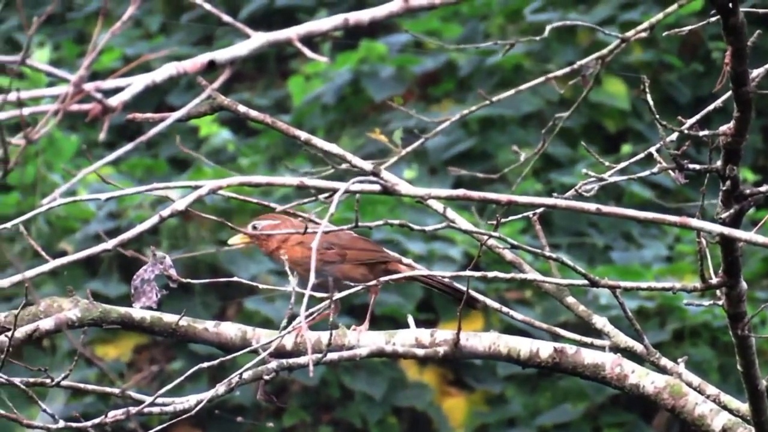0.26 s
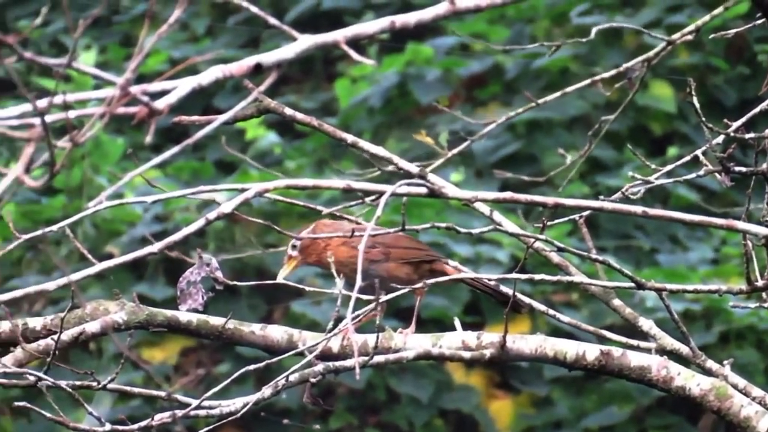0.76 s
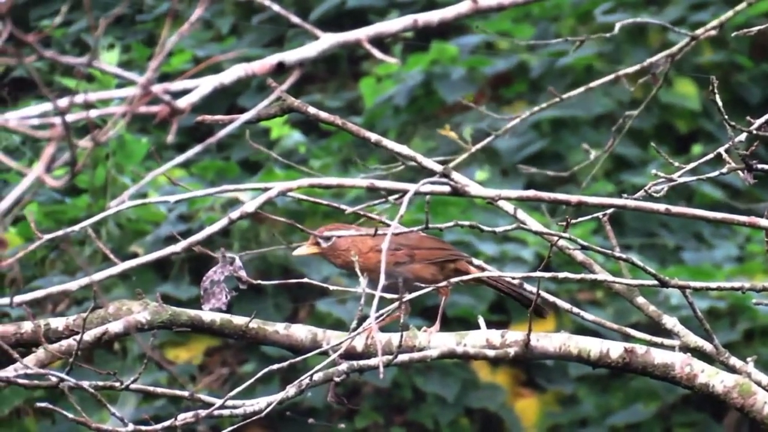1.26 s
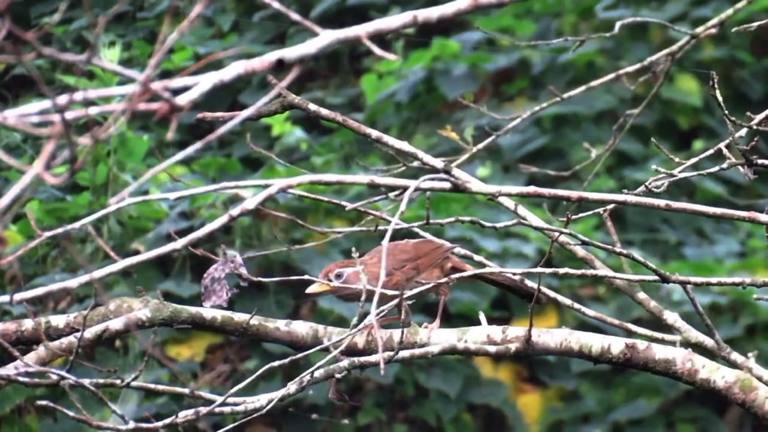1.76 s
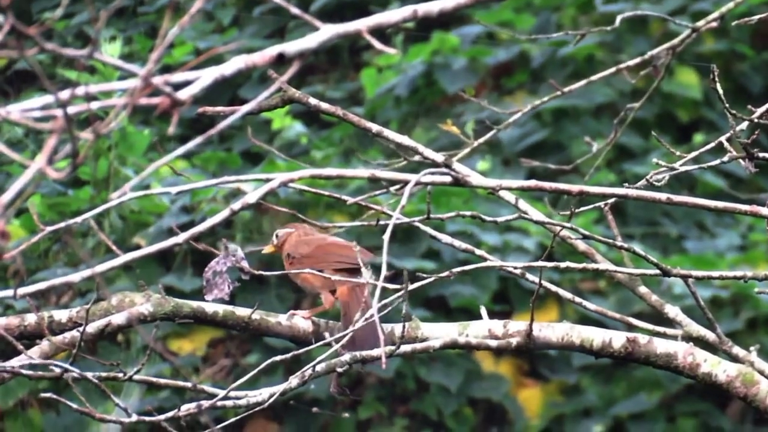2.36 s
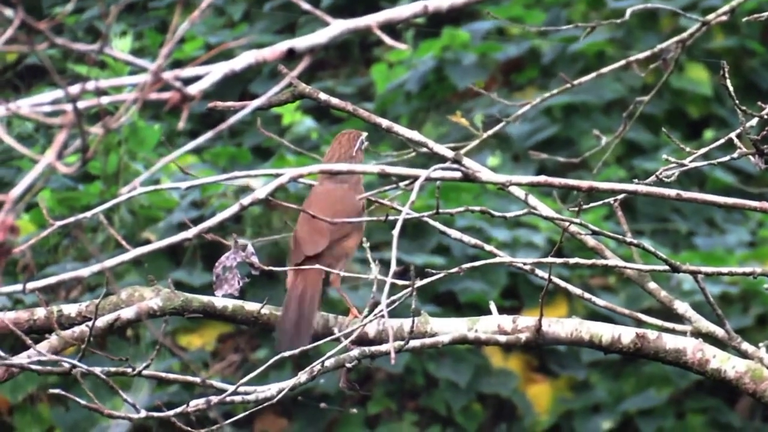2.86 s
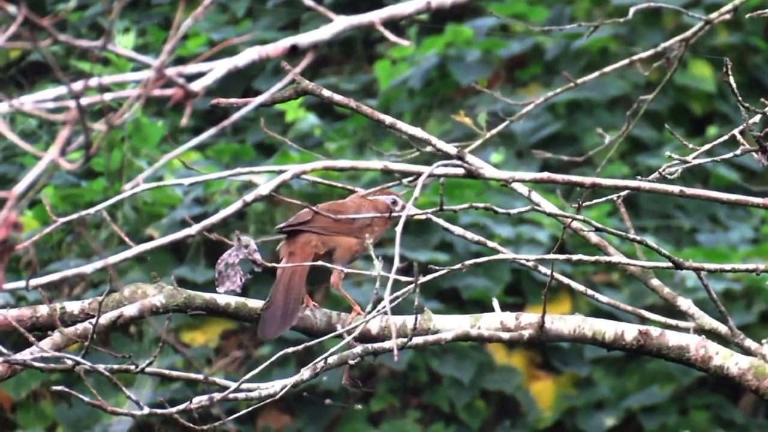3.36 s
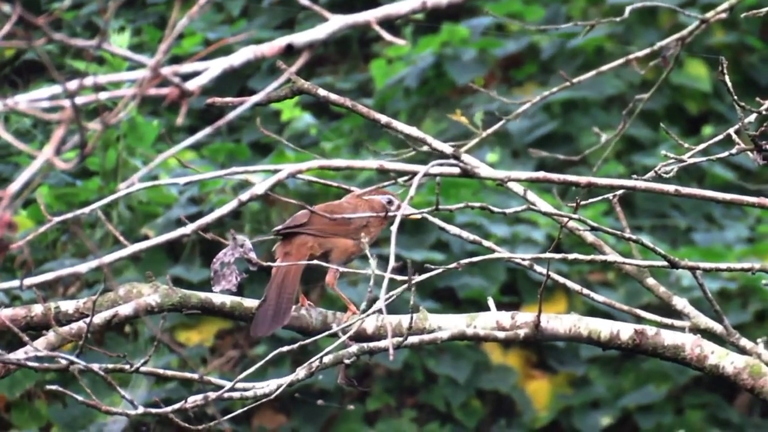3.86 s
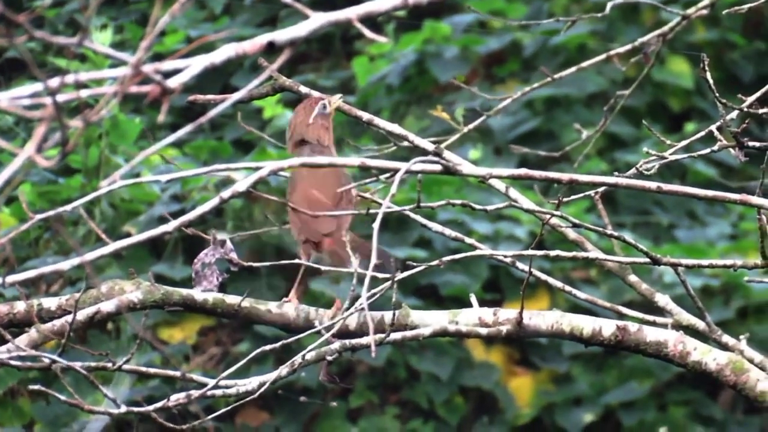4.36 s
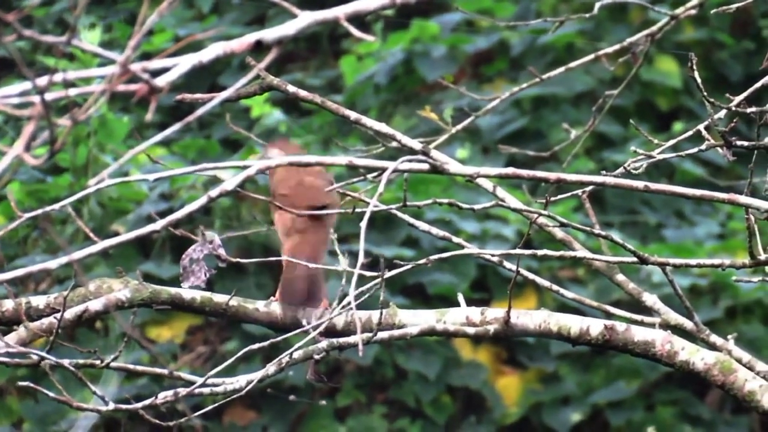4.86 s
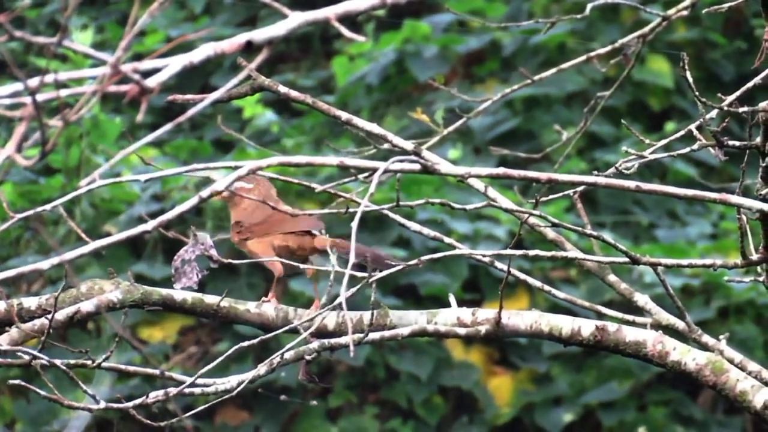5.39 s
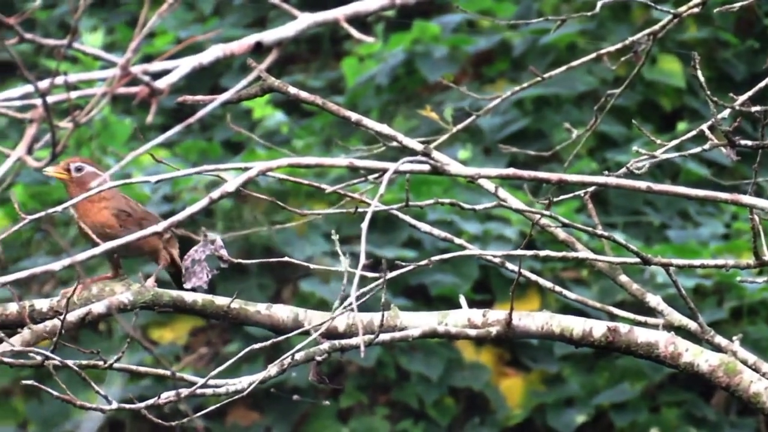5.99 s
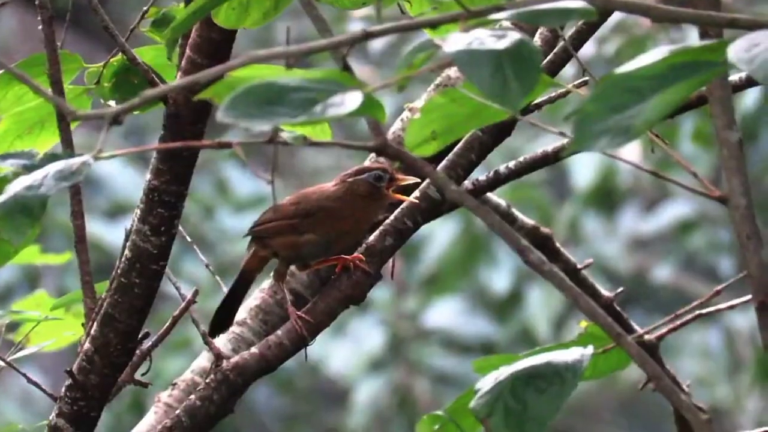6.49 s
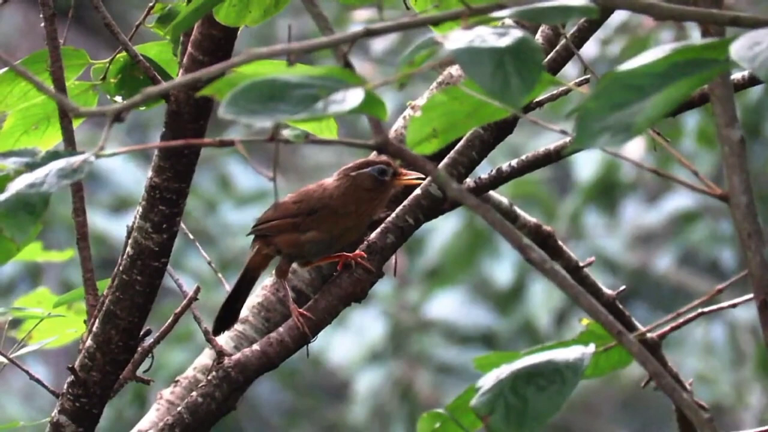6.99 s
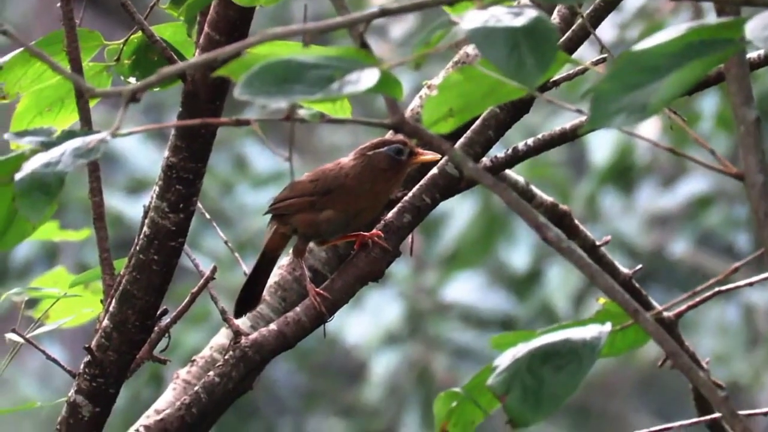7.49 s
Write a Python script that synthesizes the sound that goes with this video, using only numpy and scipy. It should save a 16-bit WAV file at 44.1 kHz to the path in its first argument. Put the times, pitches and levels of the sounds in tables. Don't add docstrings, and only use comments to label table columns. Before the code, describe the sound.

A brown thrush opens with a fast loud warble, then gives three more short rising bursts and one low rough buzz, seconds apart. Rivals whistle faintly, blurred by the wood. Crickets scrape double chirps over a steady high insect chorus and sizzling cicadas. Near the end the place shifts abruptly: clean gliding whistles, a dove cooing and a cricket ticking evenly. The tripod-mounted microphone picks up dull low thumps.

```python
import sys
import numpy as np
from scipy import signal
from scipy.fft import rfft, irfft, next_fast_len
from scipy.io import wavfile
from scipy.ndimage import uniform_filter1d, map_coordinates

SR = 44100
rng = np.random.default_rng(int(sys.argv[2]) if len(sys.argv) > 2 else 0)


def wrap_up_sound(samples):
    columns = np.atleast_2d(samples).T
    tamed = np.clip(columns, -1, 1)
    steps = np.round(tamed * 32767).astype(np.int16)
    wavfile.write(sys.argv[1], SR, steps)


def gain_from_db(level_db):
    decades = np.asarray(level_db, float) / 20
    return 10 ** decades


N = 341334
CUT_S = 6.412

# (crest time [s], crest [Hz], next trough [Hz], level [dB])
BURST_SWINGS = [
    [(.007, 2150, 1330, -22), (.028, 2500, 1500, -17), (.047, 2900, 1600, -14.5), (.066, 3200, 1680, -14),
     (.087, 3550, 1900, -14), (.107, 3600, 2300, -14), (.13, 3100, 2350, -15.5), (.146, 2900, 2400, -22)],
    [(3.105, 2150, 1450, -24), (3.125, 2250, 1550, -19), (3.146, 2550, 1800, -16), (3.166, 2900, 1850, -17),
     (3.189, 3850, 2200, -18.5)],
    [(4.641, 2050, 1450, -23), (4.66, 2200, 1600, -18), (4.68, 2350, 1700, -15), (4.699, 2500, 1850, -13),
     (4.72, 2650, 2050, -13), (4.739, 3700, 2200, -21)],
    [(5.738, 1900, 1450, -25), (5.759, 2200, 1600, -21), (5.78, 2850, 1600, -14),
     (5.8005, 3500, 1620, -13.5), (5.822, 3650, 1750, -14), (5.844, 3200, 1850, -14.5),
     (5.864, 2950, 2150, -16)],
]
# (breath [dB], hiss [dB], octave at the troughs [dB])
BURST_NOISE = [
    (-19, -33, -1),
    (-19, -36, -14),
    (-18, -37, -20),
    (-20, -27, -10),
]
BURST_START_HZ, BURST_LEAD_S, BURST_CLOSE_S = 1450, .009, .010
STRAIGHT_SHARE = .45
RASP, TROUGH_DB = .11, 4
BURR_HZ, BURR_DB, BURR_SWING_HZ = 320, 2.8, 40
BUZZ_S, BUZZ_LENGTH_S, BUZZ_DB, BUZZ_PULSE_HZ = 5.138, .198, -27.5, 78
BUZZ_START_HZ, BUZZ_END_HZ, BUZZ_SWING_HZ = 1430, 1290, 320
BUZZ_LEAD_S, BUZZ_LEAD_DB, BUZZ_BREATH_DB = .018, -9, -8
# (time [s], pitch [Hz], level [dB])
WHISTLE_GLIDES = [
    [(6.413, 2214, -29.5), (6.45, 2474, -30), (6.522, 2850, -27.5), (6.535, 2860, -21)],
    [(6.597, 4020, -29), (6.63, 3747, -30), (6.685, 3530, -26.5), (6.73, 3747, -24), (6.755, 3770, -19),
     (6.78, 3760, -20), (6.82, 3280, -35), (6.85, 3130, -43), (6.865, 3350, -24)],
    [(6.935, 1836, -41), (6.98, 1824, -32.5), (7.03, 1893, -27.5), (7.065, 1823, -30.5),
     (7.098, 1750, -29.5), (7.155, 2294, -28.5), (7.19, 2473, -28), (7.215, 2466, -35), (7.24, 2400, -44)],
]

# (time [s], length [s], level [dB])
RIVAL_FLICKS = [(0.69, 0.04, -50), (0.796, 0.034, -48.5), (0.89, 0.031, -47.5), (0.966, 0.069, -50),
                (1.79, 0.017, -48.5), (1.876, 0.023, -55), (1.965, 0.029, -52), (2.055, 0.036, -44.5),
                (2.12, 0.055, -49), (2.84, 0.026, -53), (2.973, 0.027, -51), (3.036, 0.04, -59),
                (3.943, 0.028, -57)]
FLICK_START_HZ, FLICK_END_HZ = 1450, 2860
# (time [s], length [s], start [Hz], end
# [Hz], level [dB])
RIVAL_SLIDES = [(0.432, 0.21, 1450, 2060, -51), (0.604, 0.041, 1950, 3200, -44.5),
                (0.983, 0.13, 1510, 1905, -52), (1.077, 0.021, 2330, 3320, -49),
                (1.118, 0.068, 2145, 2370, -47), (1.587, .034, 2100, 3050, -59),
                (1.85, 0.23, 1450, 1763, -53), (2.21, 0.089, 1546, 1750, -54),
                (2.299, 0.078, 1850, 2420, -49), (4.085, 0.091, 1940, 1960, -56),
                (3.412, 0.059, 1640, 1684, -45), (3.359, 0.067, 1420, 1440, -54),
                (6.002, 0.21, 1506, 1720, -56), (6.189, 0.049, 1880, 3250, -44),
                (7.33, 0.092, 548, 510, -57), (1.33, 0.2, 1490, 1500, -59), (2.45, .17, 1500, 1500, -59),
                (3.58, .22, 1500, 1564, -65)]
FLICK_LATE, SLIDE_LATE, HOOK_LATE = 0.91, 1.1, 14
# (time [s], length [s], level [dB], lift amid the note [Hz])
RIVAL_HELD = [
    (1.295, .25, -42.5, 40),
    (2.422, .264, -44, 170),
    (3.578, .252, -44.5, 190),
]
DROP_S, DROP_HZ, DROP_DB = .018, 2700, -4
HELD_HZ, HOOK_HZ = 1790, 2900
LIFT_S, LIFT_WIDTH_S = .112, .014

NEAR_CHIRPS = [.3576, .4723, .5841, .6983, 1.3458, 1.4541, 1.5628, 1.6756, 2.0742, 2.1839, 2.2967, 2.4114,
               2.9846, 3.0929, 3.2026, 3.3119, 3.4221, 4.2298, 4.3371, 4.4478, 4.5546, 4.6653, 4.7766,
               5.4455, 5.5503, 5.659, 5.7653, 5.878, 5.9898]
SOFT_CHIRPS = [.0697, .8071, .9093, 1.0111, 1.1144, 1.2191, 1.3244, 1.4301, 1.5344, 1.6432, 1.7494, 1.8577,
               1.9679, 2.5147, 3.3957, 3.4985, 3.6072, 3.7095, 3.8157, 3.921, 4.0268, 4.1305, 4.8903,
               5.8686, 5.9743, 6.0836, 6.1883, 6.2986, 6.4038]
# (first time [s], count [chirps])
HIDDEN_CHIRPS = [
    (2.078, 4),
    (5.553, 3),
]
NEAR_DB, NEAR_HZ, SOFT_DB, SOFT_HZ = -12.5, 5070, -20.5, 5428
TICK_FIRST_S, TICK_RATE_HZ, TICK_DB = 6.4275, 23.05, -25.5

# (centre [Hz], width [Hz], level [dB])
CHORUS_BANDS = [
    (3747, 542, -39),
    (4866, 890, -39.5),
    (6226, 750, -39),
]
PERCH_DB = (1.5, 1.5, 2.5)
# (time [s], half width [s], level over the rest [dB])
LOW_SURGES = [
    (.1, 0.06, 2),
    (1.25, 0.15, 1.5),
    (2.3, 0.22, 1.5),
    (3.4, 0.36, -3.5),
    (4.35, 0.11, -21),
]
THROB_HZ, THROB_DB, THROB_S = 4.27, 1.5, 7.0
DRIFT_DB = .8
# (centre [Hz], width [Hz], swells (time [s], half width [s], level [dB]))
LONE_SINGERS = [
    (4350, 130, [(.3, 0.38, -54), (.92, 0.21, -44), (2.0, 0.86, -49), (4.0, 0.67, -66)]),
    (3660, 83, [(.85, 0.08, -53), (1.2, 0.065, -44), (2.25, 0.033, -38), (3.38, 0.03, -37)]),
    (2920, 120, [(.4, 0.051, -45), (1.9, 0.15, -51), (2.4, 0.063, -44)]),
    (13200, 900, [(7.0, .3, -56), (7.6, .25, -56)]),
]
# (time [s], half width [s], level [dB])
CICADA_SWELLS = [(.08, 0.16, -43), (.78, 0.11, -43.5), (1.35, 0.11, -49), (2.25, 0.11, -45),
                 (2.6, 0.23, -49), (3.68, 0.15, -44.5), (4.3, 0.73, -51.5), (4.98, 0.19, -44.5),
                 (5.6, 0.49, -50), (6.3, 0.32, -45), (7.15, 0.41, -45.5)]
# (frequency [Hz], density [dB per Hz])
CICADA_COLOUR = [(8000, -8.5), (11000, -7), (13800, -5.5), (15800, -10.5)]
# (frequency [Hz], density [dB per Hz])
HIGH_INSECT_COLOUR = [(6500, -28), (6900, 0), (7700, 0), (8500, 6), (9300, -4.5), (10800, -7.5),
                      (12000, -43), (15800, -13)]

# (time [s], length [s], start [Hz], end [Hz], level [dB])
DOVE_COOS = [
    (0.675, 0.27, 402, 393, -60.5),
    (2.923, 0.27, 399, 393, -63),
    (5.134, 0.26, 402, 402, -61),
    (6.452, 0.15, 460, 411, -56.5),
    (6.657, 0.22, 418, 434, -42),
    (6.879, 0.15, 428, 433, -54),
    (7.072, 0.366, 416, 391, -45),
    (7.501, 0.21, 394, 418, -60),
    (7.716, 0.077, 408, 416, -50),
]
# (time [s], peak [dB], mode [Hz], decay t60 [s], sway [dB])
TRIPOD_TOUCHES = [
    (0.293, -27.5, 101, 0.23, -53),
    (1.061, -39, 103, 0.11, -52),
    (1.454, -26.5, 102, .13, -36),
    (1.612, -46, 98, .1, -43),
    (2.334, -38.5, 99, .16, -37),
    (2.632, -25, 104, 0.16, -44),
    (4.512, -42, 99, .1, -50),
    (4.711, -38, 104, 0.18, -38),
    (6.344, -23.5, 101, 0.2, -44),
]
# (time [s], peak [dB], mode [Hz], decay t60 [s], sway [dB])
TRIPOD_BUMPS = [
    (6.496, -28.5, 260, 0.03, -60),
    (6.521, -27.5, 203, 0.067, -55),
]
SWAY_HZ, SWAY_T60_S = 50, 0.17

# (frequency [Hz], decay t60 [s])
TREE_DECAY = [(400, 0.84), (1500, 0.3), (3000, 0.44), (6000, 0.25), (12000, 0.33)]
# (time [s], half width [s], level [dB], share of high notes [0-1])
FAR_PHRASES = [(.42, 0.14, -38.5, 0.75), (.98, 0.098, -46, 0.4), (1.15, 0.097, -44, 1),
               (1.35, 0.17, -41, 0.84), (1.9, 0.1, -47.5, 0.4), (2.08, 0.1, -42, 0.57),
               (2.38, 0.23, -44.5, 0.79), (3.3, 0.36, -44.5, 0.27), (3.53, 0.085, -38, 0.93),
               (3.75, 0.044, -48, 0.6), (4.18, 0.18, -45.5, 0.75), (4.56, 0.051, -47.5, 0.1),
               (4.85, 0.087, -36, 0.89), (5.4, 0.21, -48, 0.54), (6.08, 0.13, -42, 0.67),
               (6.47, 0.06, -37.5, 0.22), (6.72, 0.19, -45, 0.6), (7.1, 0.31, -46, 0.37),
               (7.56, 0.11, -39.5, 0.42)]
# (frequency [Hz], density [dB per Hz])
LOW_SONG_COLOUR = [(1150, -18.5), (1450, 3), (1900, 6), (2500, -1.5), (3200, -34)]
# (frequency [Hz], density [dB per Hz])
HIGH_SONG_COLOUR = [(1600, -46), (2200, 1), (2800, 4.5), (3200, 2.5), (3600, -24)]
# (frequency [Hz], density [dB per Hz])
AIR_COLOUR = [(76, -39), (130, 1), (141, -5), (280, -6.5), (377, -8), (539, -6.5), (585, -6), (622, -11.5),
              (812, -1.5), (1500, -15.5), (1950, -28), (3300, -120)]
AIR_DB = -56
# (time [s], half width [s], level [dB])
WIND_GUSTS = [
    (.33, 0.054, -50),
    (1.2, 0.08, -57),
    (4.5, .04, -55),
    (7.0, 1, -57),
]
# (frequency [Hz], density [dB per Hz])
WIND_COLOUR = [(12, -45), (20, -2.5), (64, 3), (103, -1.5), (130, -15.5), (170, -59), (290, -120)]
# (frequency [Hz], density [dB per Hz])
SIDE_COLOUR = [(35, -51), (60, -17), (149, -7), (425, 0), (3010, -20), (3390, -31), (3630, -39),
               (4920, -28.5), (7310, -21), (14400, -15), (15800, -41)]


def thrush():
    song = np.zeros(N)
    for rows, grit in zip(BURST_SWINGS, BURST_NOISE):
        crest, top_hz, low_hz, db = np.transpose(rows)
        crest = crest - .0015
        between = (crest[1:] + crest[:-1]) / 2
        trough = np.r_[crest[0] - BURST_LEAD_S, between, crest[-1] + BURST_CLOSE_S]
        t = np.arange(max(trough[0], 0), trough[-1], 1 / SR)
        knots = np.sort(np.r_[crest, trough])
        ramp = np.interp(t, knots, np.arange(len(knots)) % 2)
        up = STRAIGHT_SHARE * ramp + (1 - STRAIGHT_SHARE) * np.sin(np.pi * ramp / 2) ** 2
        up = up ** 1.3
        low = np.interp(t, trough, np.r_[BURST_START_HZ, low_hz])
        hz = low + (np.interp(t, crest, top_hz) - low) * up
        throat_db = -7.5 * (np.log2(hz / 2550) / .8) ** 2
        add(song, t[0], voiced(hz, np.interp(t, crest, db) + throat_db - 2, up, *grit))
    song = highpass(song, 4, 1400)
    add(song, BUZZ_S, buzz())
    return highpass(song, 6, 1200)


def buzz():
    t = np.arange(round(BUZZ_LENGTH_S * SR)) / SR
    size = len(t)
    up = .5 + .5 * np.cos(2 * np.pi * BUZZ_PULSE_HZ * t + 2.5 * wobble(40, size))
    up = up ** 1.5
    hz = np.linspace(BUZZ_START_HZ, BUZZ_END_HZ, size) + BUZZ_SWING_HZ * up
    db = BUZZ_DB + BUZZ_LEAD_DB * (t < BUZZ_LEAD_S) + 1.5 * wobble(90, size)
    return voiced(hz, db, up, BUZZ_BREATH_DB, hiss_db=-48, octave_db=-27, breath_hz=(1500, 2600), wet_db=-15)


def voiced(hz, db, up, breath_db, hiss_db, octave_db, breath_hz=(1600, 3000), wet_db=-12):
    size = len(hz)
    burr = 2 * np.pi * BURR_HZ * np.arange(size) / SR + 1.5 * wobble(60, size)
    db = db - TROUGH_DB * (1 - up) ** 2 + BURR_DB * np.cos(burr)
    level_rasp = RASP * wobble(350, size)
    pitch_rasp = RASP * wobble(600, size)
    octave = np.maximum(octave_db - 50 * up - .03 * np.maximum(hz - 1800, 0), -27)
    pitch = hz + BURR_SWING_HZ * np.sin(burr) + 300 * pitch_rasp
    voice = tone(pitch, db + 9 * level_rasp, overtone_db=octave, edge=.003)
    hiss = band(8200, 10300, size) + .6 * band(12300, 14000, size)
    breath = gain_from_db(breath_db) * band(*breath_hz, size) + gain_from_db(hiss_db) * hiss
    return twigs(voice + gain_from_db(db) * breath, wet_db)


def twigs(x, wet_db):
    t = np.arange(SR // 8) / SR
    decay = gain_from_db(-60 * t / .03) + gain_from_db(-13 - 60 * t / .16)
    scatter = band(1600, 4400, len(t)) * decay * (t > .0008)
    echo = signal.fftconvolve(x, scatter / np.linalg.norm(scatter))
    return np.pad(x, (0, len(t) - 1)) + gain_from_db(wet_db) * echo


def whistles():
    song = np.zeros(N)
    for rows in WHISTLE_GLIDES:
        t, hz, db = curves(rows)
        pitch = uniform_filter1d(hz, 700, mode="nearest") + 8 * wobble(120, len(t))
        add(song, t[0], tone(pitch, db + 1.3 * wobble(70, len(t)), overtone_db=-30, edge=.005))
    return song


def rivals():
    song = np.zeros(N)
    notes = [(s, length, FLICK_START_HZ, FLICK_END_HZ, FLICK_LATE, db, 0) for s, length, db in RIVAL_FLICKS]
    notes += [(s, length, start_hz, end_hz, SLIDE_LATE, db, 0) for s, length, start_hz, end_hz, db in RIVAL_SLIDES]
    for s, length, db, lift_hz in RIVAL_HELD:
        notes.append((s, length, HELD_HZ, HOOK_HZ, HOOK_LATE, db, lift_hz))
        notes.append((s - DROP_S, DROP_S, DROP_HZ, HELD_HZ, .7, db + DROP_DB, 0))
    for s, length, start_hz, end_hz, late, db, lift_hz in notes:
        u = np.linspace(0, 1, round(length * SR))
        hz = start_hz + (end_hz - start_hz) * u ** late + 28 * wobble(130, len(u))
        hz = hz + lift_hz * np.exp(-((u * length - LIFT_S) / LIFT_WIDTH_S) ** 2)
        level = db - .5 - 4 * u ** 8 + 2 * wobble(80, len(u))
        add(song, s, twigs(tone(hz, level, overtone_db=-35, edge=.006), wet_db=-10))
    return song


def crickets():
    out = np.zeros(N)
    hidden = [s + .1088 * k for s, count in HIDDEN_CHIRPS for k in range(count)]
    chirps = [(s, NEAR_DB, NEAR_HZ) for s in NEAR_CHIRPS]
    chirps += [(s, SOFT_DB, SOFT_HZ) for s in SOFT_CHIRPS + hidden]
    for s, db, hz in chirps:
        db, hz = db + rng.normal(0, 0.3), hz + rng.normal(0, 15)
        sink = .11 if hz < 5250 else .075
        for delay, length in ((0, 0.0083), (.0138, 0.01)):
            u = np.linspace(0, 1, round(length * SR * rng.uniform(0.97, 1.07)))
            pitch = hz * (1 + sink * rng.uniform(0.76, 1.0) * (.45 - u)) * (1 + rng.normal(0, 0.004))
            uneven_db = 0.65 * np.sin(2 * np.pi * (rng.uniform(1, 1.7) * u + rng.random()))
            level = db - 6.5 - 5 * u ** 3 + uneven_db
            stroke = tone(pitch, level, overtone_db=-28.0 - 13 * (hz > 5250), edge=0.00087)
            rough = band(4400, 8400, len(u)) + 0.33 * band(12700, 16000, len(u))
            add(out, s + delay - .0008, stroke + gain_from_db(db - 30 - 9.1 * u) * rough)
    out[round(CUT_S * SR):] = 0
    return out + ticking_cricket()


def ticking_cricket():
    out = np.zeros(N)
    u = np.linspace(0, 1, round(0.012 * SR))
    for s in np.arange(TICK_FIRST_S, N / SR, 1 / TICK_RATE_HZ):
        level = TICK_DB - .5 - 3 * u + rng.normal(0, .5)
        tick = tone(6680 - 150 * u, level, overtone_db=-60, edge=0.005)
        add(out, s - .003 + rng.normal(0, .0007), tick)
        add(out, s - .003, gain_from_db(TICK_DB - 7) * np.hanning(1100) * band(5800, 6400, 1100))
    return out


def chorus():
    t = np.arange(N) / SR
    second_perch = t > CUT_S
    throb_db = THROB_DB * second_perch * np.cos(2 * np.pi * THROB_HZ * (t - THROB_S))
    surge = swells(LOW_SURGES, 0) * gain_from_db(throb_db)
    cicada_flicker = gain_from_db(-4.5 + 1.4 * wobble(37) + 0.59 * wobble(8))
    out = swells(CICADA_SWELLS, -51.5) * cicada_flicker * coloured(CICADA_COLOUR)
    high_flicker = gain_from_db(-55.0 + 0.89 * wobble(30) + 0.35 * wobble(4.3))
    out += surge ** 0.74 * high_flicker * coloured(HIGH_INSECT_COLOUR)
    for (hz, width, db), gain, perch_db in zip(CHORUS_BANDS, (surge, 1, 1), PERCH_DB):
        kind = noise(lambda f: 1 / (1 + (2 * (f - hz) / width) ** 4) + gain_from_db(-24.5) * (f > 3000) * (f < 6800))
        flickering = unit(kind * gain_from_db(0.65 * wobble(45) + 0.8 * wobble(11)))
        out += gain * gain_from_db(db + perch_db * second_perch + DRIFT_DB * wobble(2.06)) * flickering
    for hz, width, rows in LONE_SINGERS:
        out += swells(rows, -76.5) * noise(lambda f: 1 / (1 + (2 * (f - hz) / width) ** 2))
    return out


def dove():
    out = np.zeros(N)
    for s, length, start_hz, end_hz, db in DOVE_COOS:
        size = round(length * SR)
        level = db + 1.0 * wobble(15, size)
        add(out, s, tone(np.linspace(start_hz, end_hz, size), level, overtone_db=-40, edge=0.018))
    return out


def tripod():
    out, t = np.zeros(N), np.arange(SR // 3) / SR
    for s, db, hz, t60, sway_db in TRIPOD_TOUCHES + TRIPOD_BUMPS:
        swell = 1 - np.exp(-(t * hz / 0.82) ** 1.5)
        ring = gain_from_db(db + 3.5 - 60 * (t / t60) ** 1.2) * np.sin(2 * np.pi * hz * t)
        sway = gain_from_db(sway_db + 7 - 60 * t / SWAY_T60_S) * np.sin(2 * np.pi * SWAY_HZ * t)
        knock = gain_from_db(db - 10.5 - 60 * t / 0.063) * band(120, 420, len(t))
        add(out, s, swell * (sway - ring + knock))
    return out


def trees(x):
    out, size = np.zeros(N), SR // 4
    for start in range(0, N, size):
        hz, t, z = signal.stft(rng.standard_normal(SR * 3 // 4), SR, nperseg=256)
        decay = gain_from_db(-60 * t / along(TREE_DECAY, hz)[:, None])
        tail = signal.istft(z * decay, SR, nperseg=256)[1]
        echo = signal.fftconvolve(x[start:start + size], tail / np.linalg.norm(tail))
        add(out, start / SR + .004, echo)
    return out


def wash():
    def share_db(share):
        return 10 * np.log10(np.clip(share, .01, 1))

    low = swells([(s, width, db + share_db(1 - high)) for s, width, db, high in FAR_PHRASES], -62)
    high = swells([(s, width, db + share_db(high)) for s, width, db, high in FAR_PHRASES], -65)
    song = low * coloured(LOW_SONG_COLOUR) + high * coloured(HIGH_SONG_COLOUR)
    return gain_from_db(-2.0 + 0.66 * wobble(23)) * song


def air():
    hum = gain_from_db(AIR_DB + 1.13 * wobble(3.8)) * coloured(AIR_COLOUR)
    fuller = gain_from_db(-59.5) * (np.arange(N) > CUT_S * SR) * band(136, 410, N)
    wind = swells(WIND_GUSTS, -57.0) * gain_from_db(2.5 + 3.2 * wobble(7.8)) * coloured(WIND_COLOUR)
    return hum + fuller + wind


def tone(hz, db, overtone_db, edge):
    t = np.arange(len(hz)) / SR
    phase = 2 * np.pi * np.cumsum(hz) / SR
    fade = np.clip(np.minimum(t, t[::-1]) / edge, 0, 1)
    return np.sqrt(2) * gain_from_db(db) * fade * (np.sin(phase) + gain_from_db(overtone_db) * np.sin(2 * phase))


def noise(gain):
    m = next_fast_len(N)
    spectrum = rfft(rng.standard_normal(m)) * gain(np.fft.rfftfreq(m, 1 / SR))
    return unit(irfft(spectrum, m)[:N])


def coloured(points):
    return noise(lambda f: gain_from_db(along(points, f)))


def band(lo_hz, hi_hz, size):
    return unit(signal.lfilter(*signal.butter(2, [lo_hz, hi_hz], "band", fs=SR), rng.standard_normal(size)))


def highpass(x, order, hz):
    return signal.sosfilt(signal.butter(order, hz, "high", fs=SR, output="sos"), x)


def swells(rows, rest_db):
    t = np.arange(0, N + 100, 100) / SR
    bells = sum(gain_from_db(db) ** 2 * np.exp(-((t - s) / width) ** 2) for s, width, db in rows)
    return np.interp(np.arange(N) / SR, t, np.sqrt(gain_from_db(rest_db) ** 2 + bells))


def wobble(rate, size=N):
    knots = rng.standard_normal(int(N * rate / SR) + 4)
    return map_coordinates(knots, [np.arange(N) * rate / SR])[:size]


def along(points, hz):
    f, v = np.transpose(points)
    return np.interp(np.log(hz + 1), np.log(f + 1), v)


def curves(rows):
    s, *cols = np.transpose(rows)
    t = np.arange(round(s[0] * SR), round(s[-1] * SR)) / SR
    return [t] + [np.interp(t, s, c) for c in cols]


def unit(x):
    return x / np.sqrt(np.mean(x ** 2) + 1e-20)


def add(track, s, x):
    part = track[max(round(s * SR), 0):][:len(x)]
    part += x[:len(part)]


def scene():
    harsh, clean, far, chirps = thrush(), whistles(), rivals(), crickets()
    to_trees = gain_from_db(-10.5) * harsh + gain_from_db(-19.0) * chirps
    to_trees += gain_from_db(-8) * clean * wobble(260) + gain_from_db(-7) * far * wobble(260)
    mid = harsh + clean + far + chirps + trees(to_trees)
    mid += wash() + air() + chorus() + dove() + tripod()
    side = gain_from_db(-59) * coloured(SIDE_COLOUR)
    return np.array([mid + side, mid - side])


def roll_off(x):
    return signal.sosfilt(signal.butter(12, 15930, fs=SR, output="sos"), x)


def record(dry):
    bent = dry / (1 + np.abs(dry / 1.3) ** 3) ** (1 / 3)
    below_limit = np.fft.rfftfreq(N, 1 / SR) < 15850
    finished = irfft(rfft(bent) * below_limit, N)
    return roll_off(finished)


dry = scene()
out = record(dry)
wrap_up_sound(out)
```